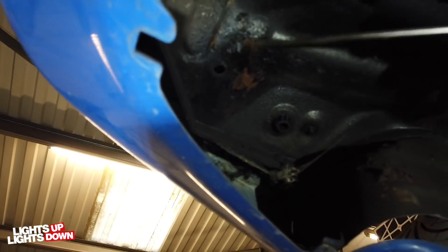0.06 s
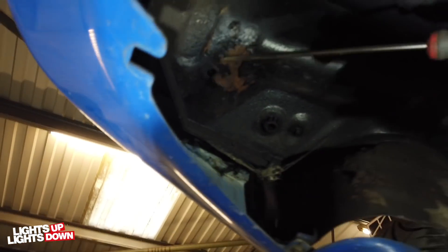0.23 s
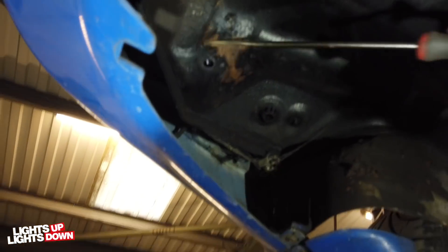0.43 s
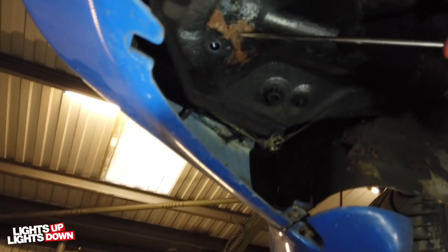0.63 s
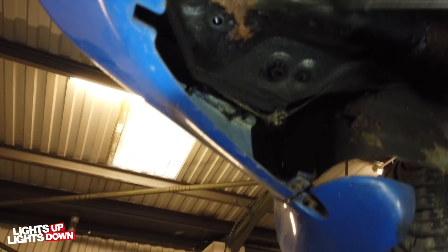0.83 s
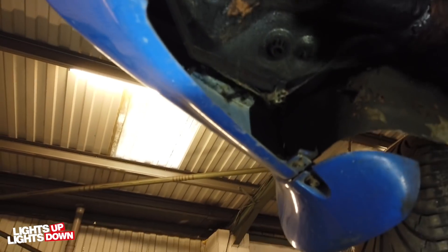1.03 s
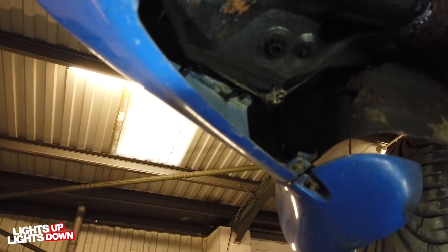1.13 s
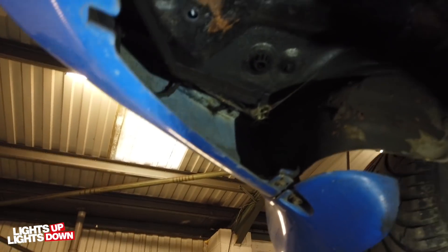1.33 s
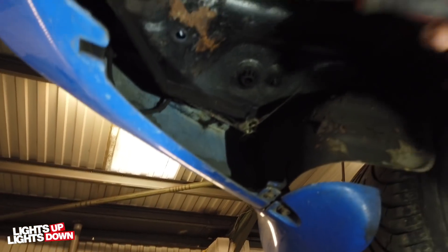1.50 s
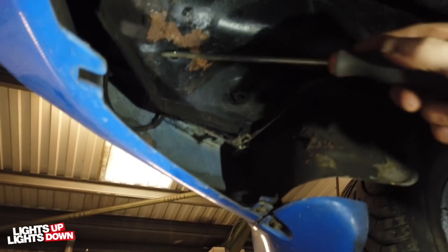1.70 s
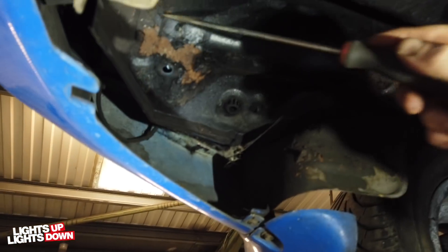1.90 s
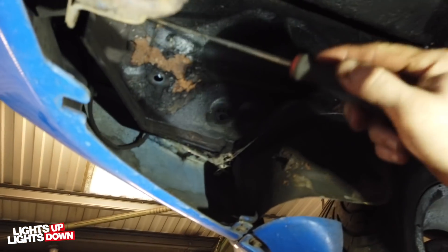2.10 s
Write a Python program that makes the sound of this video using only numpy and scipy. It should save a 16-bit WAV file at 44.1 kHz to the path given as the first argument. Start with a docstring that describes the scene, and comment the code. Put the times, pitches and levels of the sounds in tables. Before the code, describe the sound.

Close, rough scraping of a steel blade on rusted car underbody metal, with small sharp knocks

```python
"""A screwdriver tip rasps and picks at underseal on rusty sheet metal in a wheel arch, close to the microphone.
Random stick-slip impulses and single knocks excite damped panel modes, a low boom and a treble hiss of grit.
The tip moves to a second spot, a soft bump of the hand follows, then come a third spot and thick underseal.
Throughout, noise and narrow resonances make the air, hum and rumble of a workshop, and the arch turns
the phase of the treble between two microphone ports."""
import sys
import numpy as np
from scipy import signal
from scipy.fft import rfft, irfft
from scipy.io import wavfile
from scipy.ndimage import uniform_filter1d, map_coordinates

SR = 44100
rng = np.random.default_rng(int(sys.argv[2]) if len(sys.argv) > 2 else 0)


def dump(signal):
    """Clip the signal to [-1, 1] and save it as 16-bit WAV at the path in sys.argv[1]."""
    limited = np.clip(np.atleast_2d(signal).T, -1, 1)
    pcm = np.round(limited * 32767).astype(np.int16)
    wavfile.write(sys.argv[1], SR, pcm)


N = 94815

# strokes of the tip, each a list of breakpoints of its force:
# time_s, low_ring_db, upper_ring_re_low_db, grit_re_low_db, boom_re_low_db
STROKES = [
    [(0.08, -75, 16, 8, -34), (0.104, -48.5, -12, -20, -13), (0.166, -70, -5, -16, -14),
     (0.22, -31.5, -3.5, -4.5, -10.5), (0.282, -17.5, -2.5, -10, -23), (0.31, -25, -2, -6.5, -14),
     (0.318, -17, -3, -15.5, -14), (0.344, -43.5, 1, -3, -8), (0.39, -39, -6, -25, -8)],
    [(0.395, -44, -4, -8, -16), (0.413, -36, 6, -4.5, -32), (0.435, -23.5, -4, -7.5, -37),
     (0.449, -26.5, 0, -2.5, -35), (0.467, -24, 2.5, -6, -15), (0.507, -38.5, -4, -13.5, -11),
     (0.521, -41.5, -5, -11.5, -7), (0.55, -53, 8, -6, 7)],
    [(0.56, -46, -3, -7, -7), (0.592, -34.5, 0.5, 3.5, -0.5), (0.606, -20.5, -3, -14.5, -26),
     (0.63, -19, -4.5, -14.5, -15.5), (0.654, -47.5, -4, 5, -10), (0.665, -47, 13, -12, -17)],
    [(0.67, -29, -16, -14, -15), (0.682, -31, 2, -4, -20), (0.69, -28.5, 3, -5, -28),
     (0.714, -21, -4, -10.5, -30.5), (0.738, -39, -0.5, -11, -14), (0.75, -33.5, -6, -17, -19),
     (0.76, -33, -10, -5, -16)],
    [(0.765, -41, 5, -9, -11), (0.777, -30, -3.5, -3, -25), (0.811, -33, 3.5, 7.5, -3),
     (0.829, -34, -0.5, -2.5, -11), (0.855, -21, -3, -17, -18), (0.875, -30.5, -5.5, -5.5, -17),
     (0.885, -24.5, -2, -18, -10), (0.907, -36, -6, -8, -5.5), (0.925, -60, -5, 7, -7)],
    [(0.93, -56, -11, -5, -13), (0.934, -42, 0, -1.5, -8), (0.98, -27, -0.5, -11, -36),
     (0.994, -54, -6, 5, -19), (1.008, -51, 3, 8.5, -10), (1.012, -44, 4, 1, -10)],
    [(1.014, -43, 1, -6, -20), (1.024, -29.5, -12, -30, -12), (1.056, -35, -4, -13, -15.5),
     (1.108, -20.5, -7, -14, -19), (1.118, -26.5, 1.5, -0.5, -21), (1.13, -17, -5, -11.5, -28),
     (1.174, -23.5, -4, -14, -27), (1.198, -41, -5, -13, -10), (1.21, -33, -7, -8, -38)],
    [(1.212, -44, -19, 1, -16), (1.224, -35, 11, 4, -18), (1.234, -30.5, -3, 1, -22),
     (1.246, -42.5, -19, 17.5, -13), (1.256, -27, -7, -7, -16), (1.268, -41, 4, -4, -13),
     (1.29, -40.5, -4, -12, -14), (1.31, -44, 8.5, -4, -11)],
    [(1.312, -49, -3, -2, -14), (1.324, -13.5, 1.5, -34, -28.5), (1.336, -24, -18, -22, -16),
     (1.354, -32.5, -4, -9, -10.5), (1.45, -42.5, -5, -34, -19), (1.468, -44, 0, -29, -0.5),
     (1.514, -41, -10, -6.5, -8), (1.542, -50, -1.5, -26, -7), (1.6, -61, 4, -10, -1)],
    [(1.605, -66, 16, 5, 12), (1.619, -36.5, -8, -23, -6), (1.635, -37.5, -10, -24, -25),
     (1.655, -50.5, 9, 12, -5), (1.675, -27.5, 0, -8.5, -4), (1.713, -25, 5, 0, -9.5),
     (1.757, -43, -3.5, -6.5, -2), (1.831, -47.5, -3, -15, -3.5), (1.85, -45, 4, -9, -7)],
    [(1.86, -49, -1, -5, -18), (1.87, -26, 1, -2.5, -13), (1.906, -36.5, -7.5, -20, -6),
     (1.928, -46.5, 6, -0.5, 11), (1.948, -36.5, -10, -24, -0.5), (1.968, -46.5, 3.5, -3.5, 3),
     (2.034, -48, -4.5, -24, -9), (2.06, -54, 1, -40, 2.5), (2.15, -80, 8, -23, -6)],
]


def slip_forces():
    """Stick-slip friction: random impulses follow the strokes to drive low ring, upper ring, grit and boom."""
    slips_per_s, scatter_db, patchy_db = 8000, 2.3, 1.6
    chance, sign, size = rng.random((3, N))
    slips = (chance < slips_per_s / SR) * np.sign(sign - .5)
    slips = slips * undb(-scatter_db * np.log(size + 1e-9))
    slips = slips * undb(patchy_db * walk(170))
    slips = slips / np.std(slips)
    t = np.arange(N) / SR
    points = np.concatenate([np.array(stroke, float) for stroke in STROKES])
    time_s, low_db = points[:, 0], points[:, 1]
    forces = []
    for relative_db in (0, points[:, 2], points[:, 3], points[:, 4]):
        level_db = np.interp(t, time_s, low_db + relative_db, left=-90, right=-90)
        # a random rotation shifts the slips in time, so the forces do not tick together
        forces.append(np.roll(slips, rng.integers(N)) * undb(level_db))
    return np.array(forces)


def knock_forces():
    """Impact excitation: a sharp contact and decaying crunch drive the panel, and the blade pings as a mode."""
    # knocks of the tip (level before the common gain of 10, crunch_s a time constant):
    # start_s, level_db, upper_ring_re_low_db, grit_re_low_db, ping_hz, ping_re_low_db, crunch_s
    knocks = [(0.593, -34, 9, 8.5, 1710, -15, 0.0018), (0.805, -18, -2.5, -6, 2860, 1, 0.014),
              (0.934, -42.5, -9, 7.5, 1910, -8, 0.003), (0.981, -27.5, -21, -23, 1945, 14, 0.0016),
              (1.018, -11.5, -8.5, -19, 2089, 8, 0.017), (1.226, -20.5, 6, -1, 2200, 4, 0.014),
              (1.243, -18.5, -1.5, -25, 2150, -4, 0.0047), (1.321, -12, -7, -32, 2290, -9, 0.0028),
              (1.511, -38.5, 1.5, -20, 2280, -9, 0.0066), (1.618, -25.5, -8, -39, 2257, 16, 0.0013),
              (1.655, -38, -4, 8, 2320, -20, 0.002), (1.674, -27, -17, -26, 2300, -19, 0.002),
              (1.706, -20.5, 8.5, 5.5, 2413, -12, 0.0036), (1.867, -20, 1.5, -6, 2100, -18, 0.0063),
              (1.878, -32.5, 6, -23, 2200, -19, 0.0026), (1.928, -29.5, -3, -5, 2770, 7, 0.003),
              (1.939, -40.5, 4, 2.5, 6950, 5, 0.004), (1.971, -39.5, 8, -17, 2390, -6, 0.0081)]
    tick_db, ping_t60_s, ping_rise_s = -12, 0.036, 0.0054  # the tick is relative to the crunch
    forces, pings = np.zeros((3, N)), np.zeros(N)
    late = np.arange(4096) / SR
    ping_shape = fade(ping_t60_s, size=4096) * (1 - np.exp(-late / ping_rise_s))
    for start_s, level_db, upper_db, grit_db, ping_hz, ping_db, crunch_s in knocks:
        decay = fade(np.log(1000) * max(crunch_s, .0005), size=1024)  # time constant to t60
        crunch = unit(rng.standard_normal(1024) * decay)
        crunch[0] += undb(tick_db)
        i = int(start_s * SR)
        gains = undb(level_db + np.array([[0], [upper_db], [grit_db]]))
        forces[:, i:i + 1024] += 10 * gains * crunch
        pings[i:i + 4096] += undb(level_db + ping_db) * np.sin(2 * np.pi * ping_hz * late) * ping_shape
    return forces, pings


def panel(modes, bed, bed_db, spot):
    """Modal superposition: damped sines over a bed of dense short modes, detuned at random on every call."""
    # share of the free ring time left under the pressing tip, per place: share
    damping = [0.81, 0.79, 0.67, .3]
    # clear modes, set beside the dense ones, per place: level_db
    clear_db = [6, 2.5, 3.5, -23]
    shift_share, shift_db = 0.012, 2.5  # spread of mode pitch and level as the tip travels
    t = np.arange(8192) / SR
    clear = np.zeros(8192)
    for hz, t60_s, *spot_db in modes:
        level_shift, pitch_shift = rng.standard_normal(2)
        sine = np.sin(2 * np.pi * hz * (1 + shift_share * pitch_shift) * t)
        mode = unit(sine * fade(t60_s * damping[spot], size=8192))
        # thick underseal, the fourth place, keeps the mode levels of the third spot
        clear += undb(spot_db[min(spot, len(spot_db) - 1)] + shift_db * level_shift) * mode
    return undb(clear_db[spot]) * unit(clear) + undb(bed_db) * smooth(bed, size=8192)


def scraping():
    """Source-filter principle: the tip forces are convolved with the panel's response where the tip is."""
    # moves to a second spot, a third spot and thick underseal: time_s
    moves_s = [1.29, 1.602, 1.8]
    # clear panel modes: pitch_hz, t60_s, first_spot_db, second_spot_db, third_spot_db
    low_modes = [(408, 0.076, -15.5, -17, -7), (479.6, 0.11, -3.5, 3.5, -11), (530.3, 0.12, -3.5, -19, 2.5),
                 (570, 0.074, -10, 0.5, -12), (690, 0.042, -42, -11.5, -6), (786.5, 0.18, -18, -8, -13.5),
                 (842, 0.15, -15.5, -19, -13), (969, 0.055, 3.5, -14, -12), (1072, 0.099, -2, -13, -7),
                 (1164, 0.074, -3.5, 3.5, -2.5), (1285, 0.087, -19, -35, -2.5), (1333, 0.16, -21, -35, -9)]
    high_modes = [(1477, 0.058, 6.5, -30, -15), (1721.4, 0.15, 4, -22, -21), (1803, 0.046, -0.5, -8, -7),
                  (1891, 0.057, 0, -26, -12), (1982, 0.094, 2.5, -20, -22), (2050, 0.057, -10.5, -27, -5),
                  (2270, 0.079, -29, 7.5, -16), (2288, 0.13, -34, 0, 4), (2480, 0.044, -7.5, -30, -2),
                  (2808, 0.03, -3.5, 0, 3), (2927, 0.066, -1, -14, -3.5), (3352, 0.13, -5.5, -15, -2.5),
                  (3905, 0.035, -9.5, -12, -11), (4200, 0.041, -11.5, -10, 0.5),
                  (4590, 0.032, -15.5, -9.5, -22)]
    # dense short modes between the clear ones: frequency_hz, density_db (per Hz)
    low_bed = [(300, -16), (380, 6.5), (500, 0), (690, 2), (900, 2.5), (1450, 1.5), (1900, -32.5)]
    high_bed = [(1200, -73), (1500, 4), (2300, 7.5), (2620, -10), (2900, 1), (3700, -12.5), (4200, -6),
                (5200, -23), (6000, -74.5)]
    # colour of the grit: frequency_hz, density_db (per Hz)
    grit_colour = [(2650, -17), (4500, -7), (5060, -6.5), (6250, -10.5), (6880, -5), (8200, -8.5),
                   (10600, 2.5), (11700, -10), (14000, -9.5), (15200, -11), (16000, 0)]
    # boom of the panel, and on thick underseal: frequency_hz, density_db (per Hz)
    boom_colour = [(100, -16.5), (135, -3.5), (158, -1.5), (190, -10), (280, -3.5), (400, -18.5)]
    thick_colour = [(120, -40), (180, -4), (260, 12), (320, 7.5), (400, -21.5)]
    grit_smear_db, grit_t60_s = -6.5, 0.031

    low, high, grit, boom = slip_forces()
    knocks, out = knock_forces()
    low, high, grit = low + knocks[0], high + knocks[1], grit + knocks[2]

    thick = np.arange(N) > moves_s[-1] * SR
    out = out + ring(boom * ~thick, band(smooth(boom_colour), 113, 336))
    out = out + ring(boom * thick, smooth(thick_colour))

    smear = undb(grit_smear_db) * tail(grit_colour, grit_t60_s)
    grit_response = band(smooth(grit_colour) + smear, 3900, 13650)
    # the panel response is renewed at every third breakpoint of a stroke
    edges = [int(point[0] * SR) for stroke in STROKES for point in stroke[:-1:3]] + [N]
    for a, b in zip(edges, edges[1:]):
        spot = int(np.searchsorted(moves_s, a / SR))
        low_response = band(panel(low_modes, low_bed, -10.5, spot), 420, 1483)
        high_response = band(panel(high_modes, high_bed, 0.5, spot), 1566, 6960)
        for force, response in ((low, low_response), (high, high_response), (grit, grit_response)):
            rung = signal.fftconvolve(force[a:b], response)[:N - a]
            out[a:a + len(rung)] += rung
    return out


def thump():
    """Damped oscillation: a soft bump of the hand is one low sine that dies away exponentially."""
    start_s, pitch_hz, level_db, t60_s = 1.466, 254, -24.5, 0.019
    t = np.maximum(np.arange(N) / SR - start_s, 0)
    return undb(level_db) * np.sin(2 * np.pi * pitch_hz * t) * np.exp(-np.log(1000) * t / t60_s)


def hall(near):
    """Diffuse reverberation: convolution with coloured noise that decays exponentially."""
    t60_s, level_db, corner_hz = 0.53, -22, 2310
    colours = [(150, -10), (400, 0), (corner_hz, 0), (3 * corner_hz, -18)]  # frequency_hz, density_db
    return undb(level_db) * ring(near, tail(colours, t60_s, size=32768))


def shop():
    """Filtered noise: steady workshop air, a narrow-band hum and a deep resonance that swells as rumble."""
    # colour of the air: frequency_hz, density_db (per Hz)
    air_colour = [(12, -47), (20, -23), (96, -8), (127, -20), (319, -30.5), (485, -28.5), (607, -29.5),
                  (3160, -37.5), (4810, -41.5), (5380, -46.5), (16000, -51.5)]
    # swells of the deep rumble: time_s, level_db
    rumble_levels = [(0.0, -36.5), (0.17, -54), (0.24, -34), (0.87, -38), (0.97, -54), (1.07, -39.5),
                     (1.77, -42.5), (1.81, -55), (1.86, -37), (1.89, -48), (1.99, -41.5), (2.05, -51),
                     (2.11, -45), (2.15, -49)]
    air_db, hum_db = -52.5, -50
    air = colour(colour(rng.standard_normal(N), [(40, -46), (55, 0)]), air_colour)
    above = colour(air, [(125, -80), (130, 0)])  # the air level is set by this part alone
    time_s, level_db = np.array(rumble_levels).T
    rumble = resonance(36, 24.7) * undb(np.interp(np.arange(N) / SR, time_s, level_db))
    hum = undb(hum_db) * resonance(106.06, 5.1)
    return air / np.std(above) * undb(air_db) + rumble + hum


def heard():
    """Linear superposition: scraping, its reverberation, the bump and the workshop add."""
    near = scraping()
    return near + hall(near) + thump() + shop()


def undb(db):
    """Level to amplitude: 20 dB is a factor of ten."""
    return 10 ** (np.asarray(db) / 20)


def unit(x):
    """Energy normalisation: the squares sum to 1."""
    return x / np.sqrt(np.sum(x ** 2))


def colour(x, table):
    """Zero-phase spectral weighting by (Hz, dB) points, interpolated on a log frequency axis."""
    hz, db = np.array(table, float).T
    f = np.maximum(np.arange(len(x) // 2 + 1) * SR / len(x), 1)
    gain = undb(np.interp(np.log(f), np.log(np.maximum(hz, 1)), db))
    return irfft(rfft(x) * gain, len(x))


def smooth(table, size=16384):
    """Minimum phase by folding the cepstrum: the most compact causal response of a colour, energy 1."""
    gain = np.abs(rfft(colour(np.eye(1, size)[0], table)))
    cepstrum = irfft(np.log(gain + 1e-6))
    cepstrum[1:size // 2] *= 2
    cepstrum[size // 2 + 1:] = 0
    return unit(irfft(np.exp(rfft(cepstrum))))


def fade(t60, size=16384):
    """Exponential decay: the amplitude falls by 60 dB in t60 seconds."""
    return np.exp(-np.log(1000) * np.arange(size) / SR / t60)


def tail(table, t60, size=16384):
    """Diffuse decay: coloured noise that dies away, energy 1."""
    return unit(colour(rng.standard_normal(size), table) * fade(t60, size=size))


def ring(x, response):
    """Convolution: every impulse of the force starts a scaled copy of the response."""
    return signal.fftconvolve(x, response)[:N]


def band(x, lo_hz, hi_hz):
    """Butterworth band-pass: steep skirts about a flat band, energy 1."""
    return unit(signal.sosfilt(signal.butter(3, [lo_hz, hi_hz], "band", fs=SR, output="sos"), x))


def resonance(hz, width_hz):
    """Noise-driven resonance: white noise through two equal resonators in series, rms 1."""
    x = rng.standard_normal(N)
    for _ in range(2):
        x = signal.lfilter(*signal.iirpeak(hz, hz / width_hz, fs=SR), x)
    return x / np.std(x)


def walk(rate):
    """Low-rate random modulation: levels drawn rate times a second and slewed, spread near 1."""
    k = int(SR / rate)
    held = np.repeat(rng.standard_normal(N // k + 1), k)
    return 1.2 * uniform_filter1d(held, k)[:N]


def scene():
    """Phase difference between two ports: opposite turns wander with pitch and time, most in the treble."""
    # scale of the phase between the ports: frequency_hz, spread_rad (times a smoothed random field)
    port_spread = [(60, 0.29), (200, 0.036), (380, 0.21), (700, 0.11), (1290, 0.25), (1800, 0.72),
                   (2400, 2.21), (8000, 2.03), (15000, 2.6)]
    offset_band_hz, offset_drift_s = 220, .035  # how wide and how long a phase offset holds
    hz, t, cells = signal.stft(heard(), SR, nperseg=512)
    knots = rng.standard_normal((200, 200))
    places = np.meshgrid(hz / offset_band_hz, t / offset_drift_s, indexing="ij")
    field = map_coordinates(knots, places, order=3)
    at_hz, spread_rad = np.array(port_spread).T
    spread = np.interp(np.log(hz + 1), np.log(at_hz), spread_rad)[:, None]
    turn = np.exp(.5j * spread * field)  # half the phase to each port
    return np.array([signal.istft(cells * g, SR, nperseg=512)[1][:N] for g in (turn, turn.conj())])


def record(dry):
    """Linear filtering: a slight treble lift brightens the scraping, and an elliptic low-pass cuts the top."""
    lifted = [colour(x, [(1500, 0.035), (2400, 1.42)]) for x in dry]
    top_hz = 16000
    return signal.sosfilt(signal.ellip(10, .2, 80, top_hz, fs=SR, output="sos"), lifted)


dry = scene()
out = record(dry)
dump(out)
```